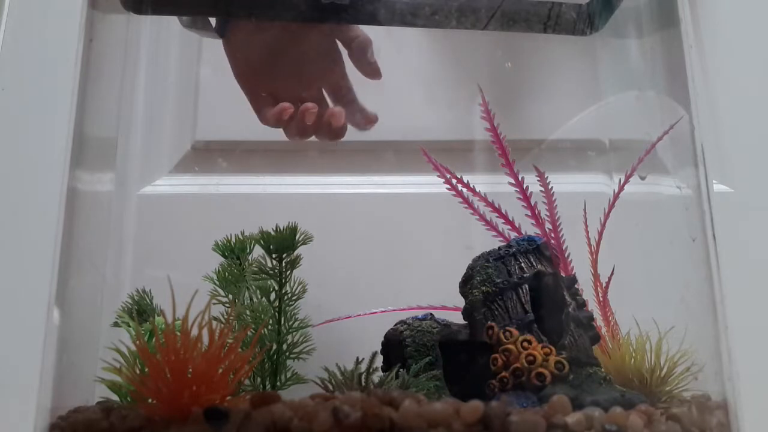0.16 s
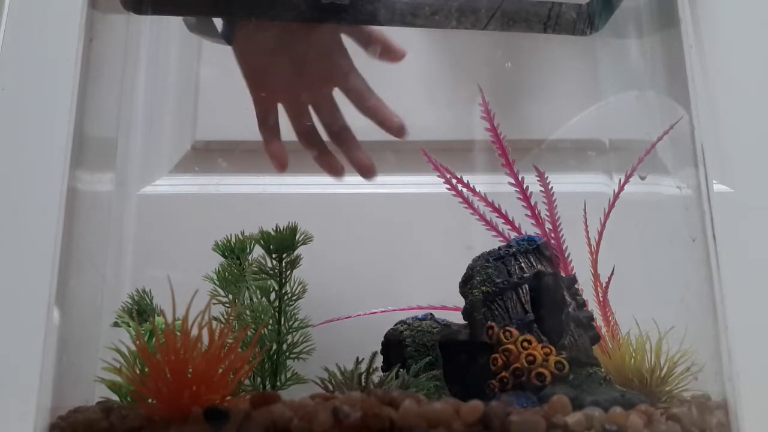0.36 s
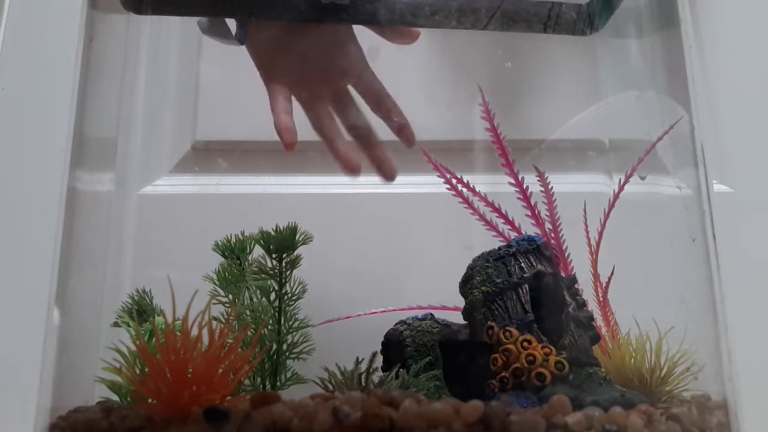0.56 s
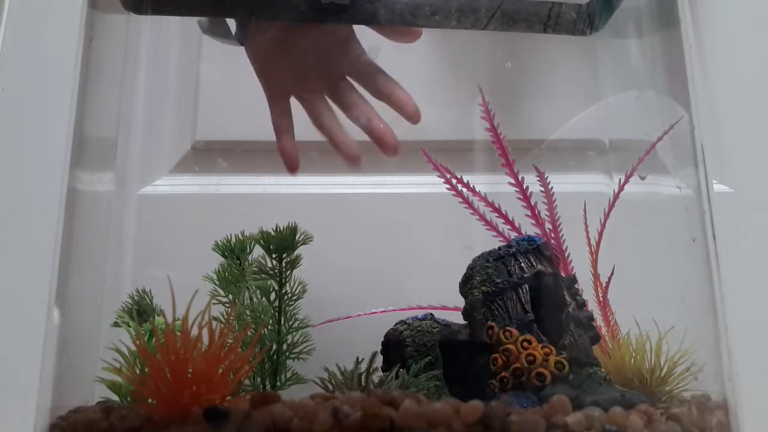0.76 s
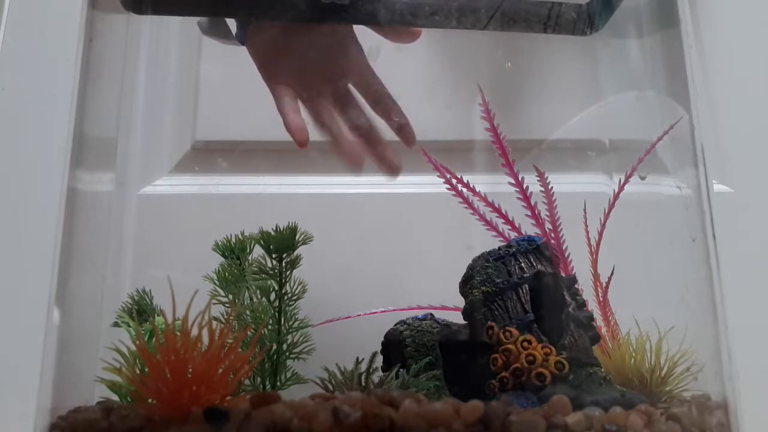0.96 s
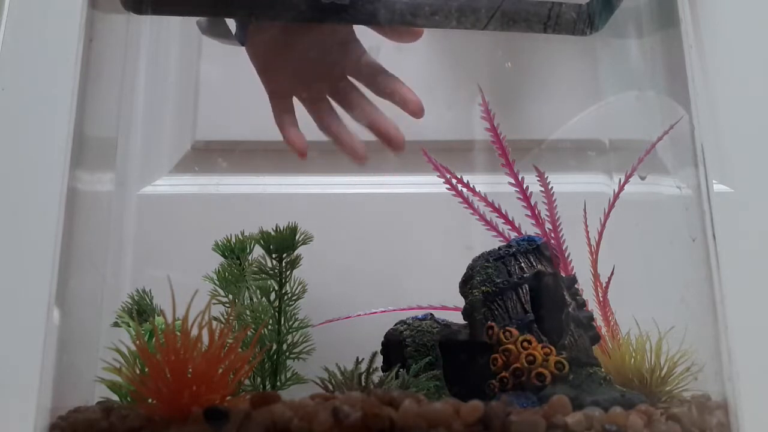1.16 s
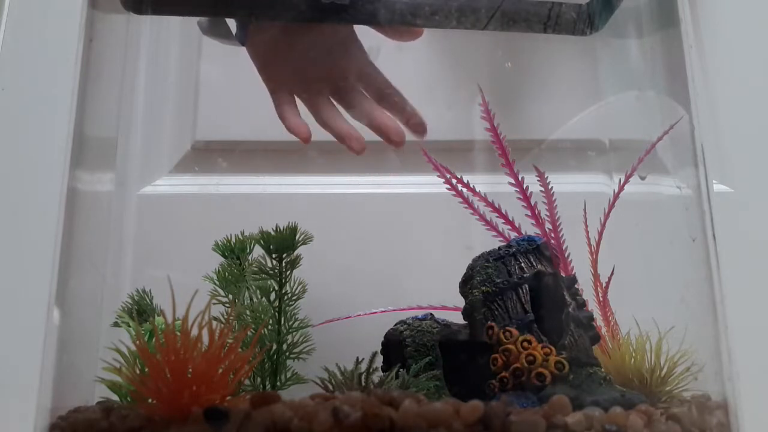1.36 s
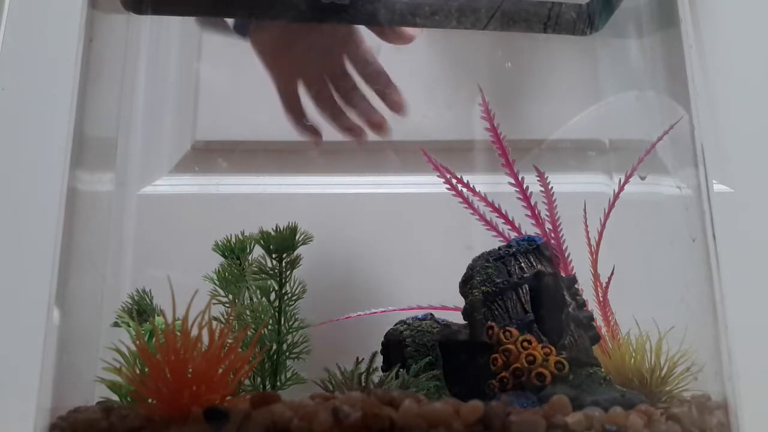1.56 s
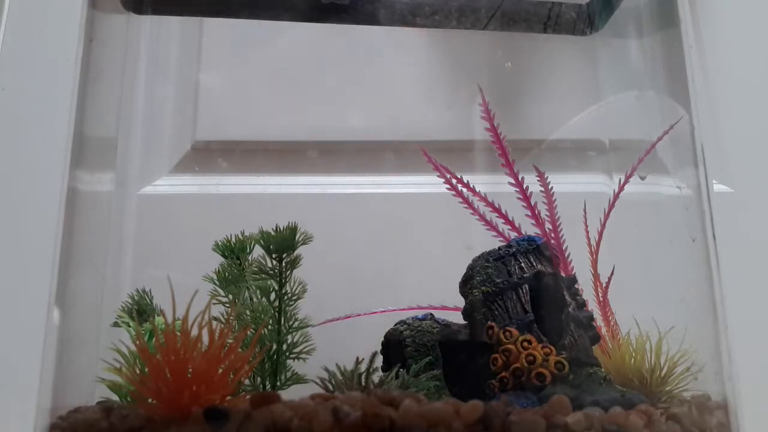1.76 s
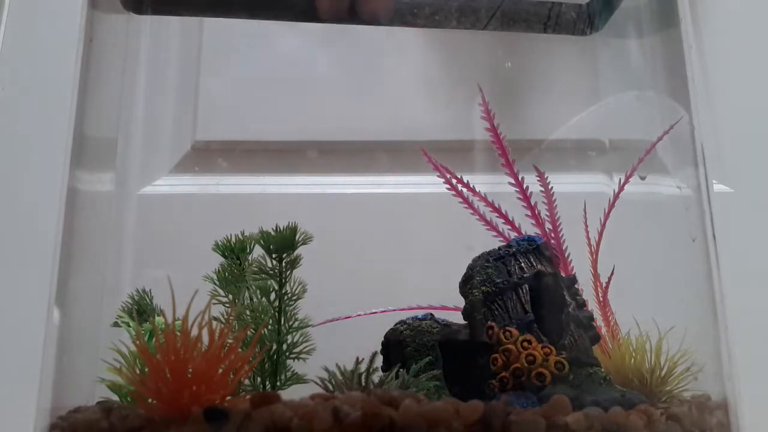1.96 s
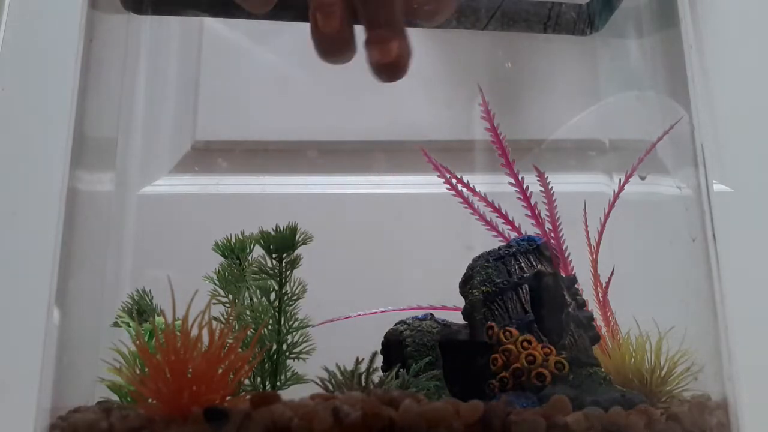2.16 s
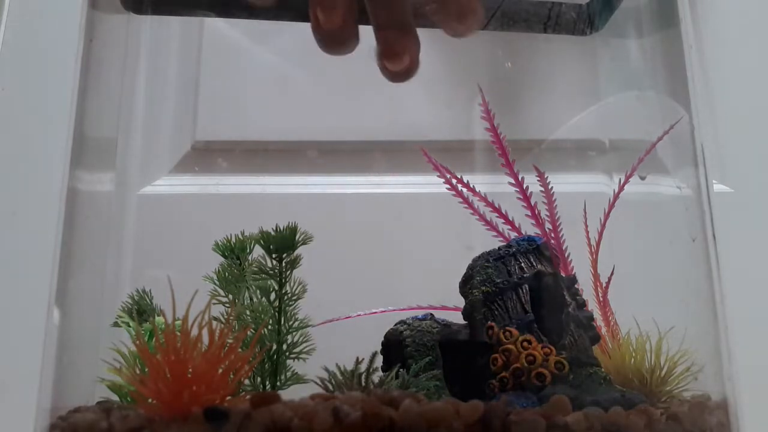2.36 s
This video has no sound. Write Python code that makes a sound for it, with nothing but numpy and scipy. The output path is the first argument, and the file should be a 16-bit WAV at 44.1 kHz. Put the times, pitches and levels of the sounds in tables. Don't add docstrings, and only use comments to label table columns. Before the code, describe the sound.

A rapid run of hollow finger taps on a glass aquarium, then muffled pats, faint sliding skin and a final light tap on the pane, heard close up over steady low hum and slight hiss.

```python
import sys
import numpy as np
from scipy import signal
from scipy.fft import rfft, irfft
from scipy.io import wavfile

SR = 44100
rng = np.random.default_rng(int(sys.argv[2]) if len(sys.argv) > 2 else 0)


def how_loud(loudness_db):
    steps = np.asarray(loudness_db, float) / 20
    return 10 ** steps


def int16_out(signal):
    q = np.round(np.clip(np.atleast_2d(signal).T, -1, 1) * 32767)
    wavfile.write(sys.argv[1], SR, q.astype(np.int16))


N = 106677
TIME_S = np.arange(N) / SR
STRIKE_S = np.arange(SR // 2) / SR
HARD_RISE_S, SOFT_RISE_S = 0.00073, 0.0027
SIGN = np.array([[1.], [-1.]])


def evened(x):
    return x / np.sqrt(np.mean(x ** 2) + 1e-20)


def read(points, hz):
    f, value = np.transpose(points)
    return np.interp(np.log(hz + 1), np.log(f + 1), value)


def add(mix, start_s, sound):
    part = mix[max(round(start_s * SR), 0):][:len(sound)]
    part += sound[:len(part)]


def coloured(points, size=N):
    hz = np.fft.rfftfreq(size, 1 / SR)
    last_hz, last_db = points[-1]
    points = points + [(last_hz * 1.5, last_db - 30)]
    white = rfft(rng.standard_normal(size))
    return irfft(white * how_loud(read(points, hz)) * np.sqrt(SR / 2), size)


def slow(rate_hz):
    rates_hz = np.geomspace(rate_hz / 10, rate_hz, num=12)
    return evened(sum(np.sin(2 * np.pi * (f * TIME_S + rng.random())) / np.sqrt(f) for f in rates_hz))


def hum():
    # hz, rms_db
    lines = [(119.9, -43.5), (240, -60), (360, -77.5)]
    total = np.zeros(N)
    for hz, db in lines:
        level = np.sqrt(2) * how_loud(db - 0.37 * slow(5))
        total += level * np.sin(2 * np.pi * (hz * TIME_S + rng.random()))
    return total


def room():
    # hz, db_per_hz
    rumble = [(30, -100), (60, -90), (110, -72), (170, -84.5), (330, -85.5), (600, -100), (1100, -116),
              (2500, -126)]
    return coloured(rumble) + SIGN * how_loud(-26) * coloured(rumble)


def microphone_hiss():
    # hz, db_per_hz
    spectrum = [(300, -112), (1500, -121), (3000, -121), (5800, -122), (6500, -117), (9500, -116),
                (11000, -120), (15000, -121)]
    shared = 0.55
    own = np.array([coloured(spectrum), coloured(spectrum)])
    return how_loud(3) * (np.sqrt(shared) * coloured(spectrum) + np.sqrt(1 - shared) * own)


def ring(t, hz, rise_s, t60_s):
    swell = 1 - np.exp(-t / max(rise_s, 1e-4))
    return swell * how_loud(-60 * t / t60_s) * np.sin(2 * np.pi * hz * t)


def rattle(t, rise_s):
    # hz, db_per_hz
    slap = [(150, -33), (300, 4), (450, -9), (650, -1.5), (1200, -14), (2000, -22), (3000, -30),
            (7000, -46)]
    t60_s = 0.17
    return evened(coloured(slap, size=len(t))) * (1 - np.exp(-t / rise_s)) * how_loud(-60 * t / t60_s)


def knock(t, rise_s, knock_db, low_db, high_db):
    # hz, level_db, t60_s
    plate_modes = [(424, -11, 0.42), (549, -12, 0.17), (613, 2.4, 0.061), (693, 0, 0.037),
                   (765, -7.5, 0.22), (820, -19, .25), (991, -12.5, 0.18), (1096, -16, 0.043),
                   (1178, -8, 0.047), (1385, -12.5, 0.033), (1493, -25.5, 0.44), (1745, -23.5, .25),
                   (2018, -23.5, 0.16), (2380, -34, .2)]
    # hz, partner_hz, partner_share, rise_s, t60_s
    air_pairs = [(253.7, 218, 0.31, 0.019, 0.33), (331.9, 362, 0.28, 0.0033, 0.21)]
    spot_db = 6 * rng.standard_normal(len(plate_modes))
    plates = np.zeros(len(t))
    for (hz, db, t60_s), shift_db in zip(plate_modes, spot_db):
        plates += how_loud(db + shift_db) * ring(t, hz, rise_s * 1000 / hz, t60_s)
    booms = []
    for hz, partner_hz, share, swell_s, t60_s in air_pairs:
        booms.append(ring(t, hz, swell_s, t60_s) + share * ring(t, partner_hz, swell_s, t60_s))
    struck = how_loud(knock_db - 5) * (plates + how_loud(1.5) * rattle(t, rise_s))
    return struck + how_loud(low_db + 3.5) * booms[0] + how_loud(high_db + 3.5) * booms[1]


def touches():
    # start_s, knock_db, lower_boom_db, upper_boom_db
    pads = [(.012, -64, -60, -66), (.174, -69, -42.5, -36), (.257, -41, -41, -49),
            (.318, -33.5, -37.5, -36), (.675, -65, -62, -55), (.785, -56, -48, -70), (.802, -59, -60, -46),
            (0.912, -66.5, -61, -87), (1.045, -48, -43, -71), (1.175, -65, -61, -52),
            (1.205, -64, -81, -72), (1.377, -54.5, -41, -44.5), (1.41, -57.5, -40.5, -71),
            (1.601, -63, -55, -59), (1.63, -56.5, -68, -50.5)]
    body = np.zeros(N)
    for start_s, *levels_db in pads:
        add(body, start_s, knock(STRIKE_S, SOFT_RISE_S, *levels_db))
    return body


def tick(t, db):
    # hz, db_per_hz
    nail = [(1500, -9), (3000, -10.5), (4500, -6), (6000, -2.5), (8500, -1.8), (11000, -5), (13000, -11),
            (15500, -59)]
    # hz, db_per_hz
    echo = [(1500, -10), (2500, -22), (3500, -8.5), (6500, -9), (8000, -12), (10000, -22)]
    peak_s, crack_t60_s, echo_t60_s, echo_rise_s = 0.00054, 0.074, 0.4, 0.022
    click = t / peak_s * np.exp(1 - t / peak_s)
    crack = how_loud(-9 - 60 * t / crack_t60_s) * np.minimum(t / peak_s, 1)
    after = how_loud(-11.5 - 60 * t / echo_t60_s) * (1 - np.exp(-t / echo_rise_s))
    pair = []
    for _ in ("mid", "side"):
        direct = (click + crack) * evened(coloured(nail, size=len(t)))
        pair.append(direct + after * evened(coloured(echo, size=len(t))))
    return how_loud(db + 5.5) * np.array(pair)


def taps():
    # start_s, knock_db, lower_boom_db, upper_boom_db, tick_db
    hits = [
        (0.099, -35, -39, -33.5, -63),
        (0.161, -35.5, -34.5, -37.5, -66),
        (0.242, -36.5, -37.5, -34, -64),
        (0.303, -27, -29, -34.5, -50),
    ]
    tick_lead_s = 0.0017
    body, fine = np.zeros(N), np.zeros((2, N))
    for start_s, knock_db, low_db, high_db, tick_db in hits:
        add(body, start_s, knock(STRIKE_S, HARD_RISE_S, knock_db, low_db, high_db))
        add(fine.T, start_s - tick_lead_s, tick(STRIKE_S, tick_db).T)
    return body, fine


def thumps():
    # start_s, level_db, pitch_hz
    stand = [(0.101, -55, 73.4), (0.167, -51, 72.4), (.245, -54, 74.5), (0.299, -47.5, 74),
             (0.384, -57, 69), (.605, -60, 68.6), (0.679, -49, 81), (0.757, -51.5, 72), (.8, -49.5, 74),
             (1.043, -43, 180), (1.375, -49.5, 168), (0.783, -55.5, 192), (1.049, -41, 78.5),
             (1.105, -53, 72), (1.164, -54, 75), (1.275, -66, 74), (1.388, -41, 75.6), (1.495, -56, 70.5)]
    body = np.zeros(N)
    for start_s, db, hz in stand:
        u = STRIKE_S * hz / 2.6
        bell = np.sin(np.pi * np.minimum(u / 2, 1) ** 0.52) ** 2
        add(body, start_s, how_loud(db + 4.5) * bell * np.sin(2 * np.pi * hz * STRIKE_S))
    return body


def stroke(start_s, length_s, skew):
    u = np.clip((TIME_S - start_s) / length_s, 0, 1)
    return abs(np.sin(np.pi * u ** skew))


def slides():
    # start_s, length_s, level_db
    drags = [
        (0.343, 0.21, -61),
        (0.74, 0.17, -74.5),
        (1.02, 0.13, -68),
        (1.591, 0.15, -66),
        (2.1, 0.15, -75.5),
    ]
    # hz, db_per_hz
    skin = [(300, -4), (700, -4), (1200, 0), (1400, -7), (1750, 0), (2050, -5), (2400, -22), (3000, -32)]
    friction = evened(coloured(skin)) * how_loud(0.55 * slow(82))
    body = np.zeros(N)
    for start_s, length_s, db in drags:
        body += np.sqrt(stroke(start_s, length_s, 1.1)) * how_loud(db) * friction
    return body


def swishes():
    # start_s, length_s, level_db
    brushes = [
        (.38, .19, -76),
        (1.57, .165, -69.5),
    ]
    # hz, db_per_hz
    skin_hiss = [(2800, -30), (3250, -3), (3800, -25), (6500, -10), (9500, -8), (11000, -1), (14300, 0),
                 (15000, -20)]
    hiss = np.array([evened(coloured(skin_hiss)) for _ in ("mid", "side")])
    fine = np.zeros((2, N))
    for start_s, length_s, db in brushes:
        fine += stroke(start_s, length_s, 1.7) * how_loud(db) * hiss
    return fine


def flick():
    # start_s, level_db
    graze = (1.045, -74)
    fine = np.zeros((2, N))
    add(fine.T, graze[0], tick(STRIKE_S, graze[1]).T)
    return fine


def pane_tap():
    # hz, level_db, t60_s
    pane_modes = [(244.8, -4, 0.25), (344, 3.5, 0.077), (420, -2, 0.17), (591, 0, .06), (764, -10, 0.18),
                  (972, -10.5, 0.32), (1518, -29, 0.39), (1780, -3, 0.031), (1840, -20.5, 0.25),
                  (1922, 6.5, 0.019), (1984, -17, 0.15), (2326, -11, 0.033), (2570, -29, 0.12),
                  (3570, -6.5, 0.011)]
    start_s, pane_db, tick_db, rattle_db = 2.318, -38.5, -63.5, -42
    pane = np.zeros(len(STRIKE_S))
    for hz, db, t60_s in pane_modes:
        pane += how_loud(db) * ring(STRIKE_S, hz, (700 / hz) ** 0.55 * 0.0046, t60_s)
    body, fine = np.zeros(N), np.zeros((2, N))
    add(body, start_s, how_loud(pane_db) * pane + how_loud(rattle_db) * rattle(STRIKE_S, HARD_RISE_S))
    add(fine.T, start_s, tick(STRIKE_S, tick_db).T)
    return body, fine


def scene():
    tap_body, tap_fine = taps()
    pane_body, pane_fine = pane_tap()
    body = touches() + tap_body + thumps() + slides() + pane_body
    fine_mid, fine_side = tap_fine + swishes() + flick() + pane_fine
    side = how_loud(-15) * np.gradient(body) * 3 + how_loud(-6) * fine_side
    return body + fine_mid + SIGN * side + hum() + room()


def band_limit(x):
    return signal.sosfilt(signal.butter(12, 15710, fs=SR, output="sos"), x)


def record(dry):
    low_cut = signal.butter(N=2, Wn=48, btype="high", fs=SR, output="sos")
    heard = signal.sosfilt(low_cut, dry) + microphone_hiss()
    fade = np.minimum(np.arange(N)[::-1] / (0.004 * SR), 1)
    treble_limit = signal.firwin(255, 15760, fs=SR)[None]
    mix = signal.oaconvolve(heard * fade, treble_limit, "same")
    return band_limit(mix)


dry = scene()
out = record(dry)
int16_out(out)
```